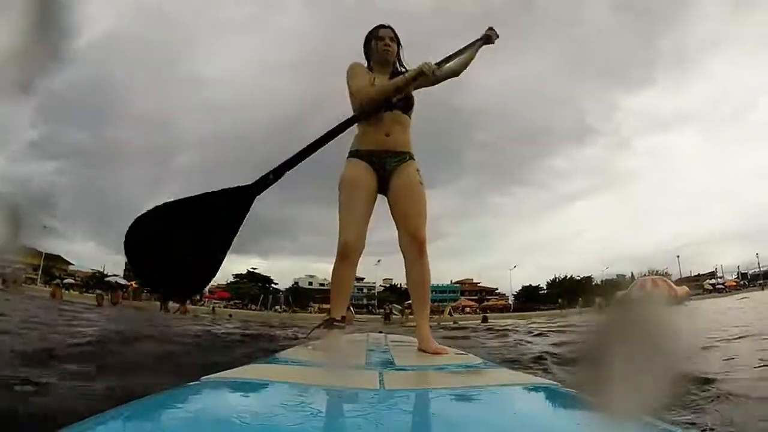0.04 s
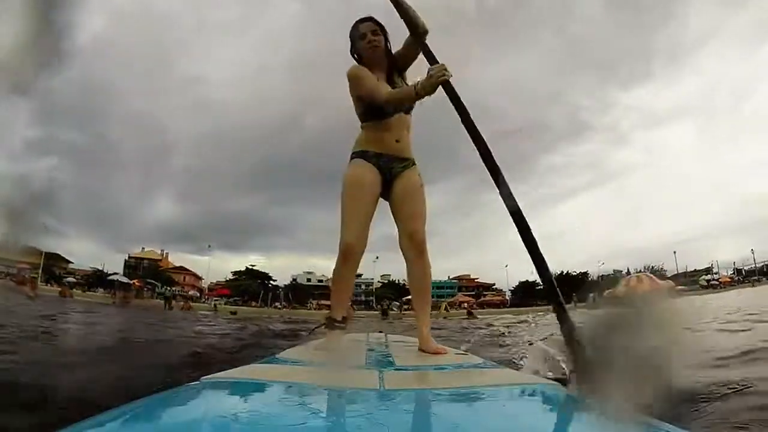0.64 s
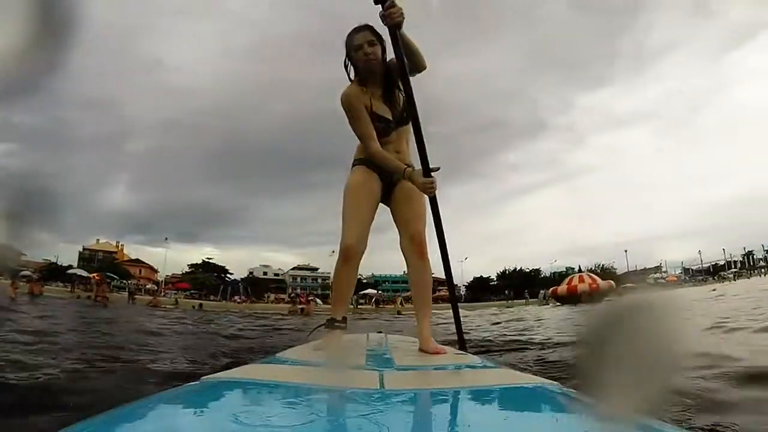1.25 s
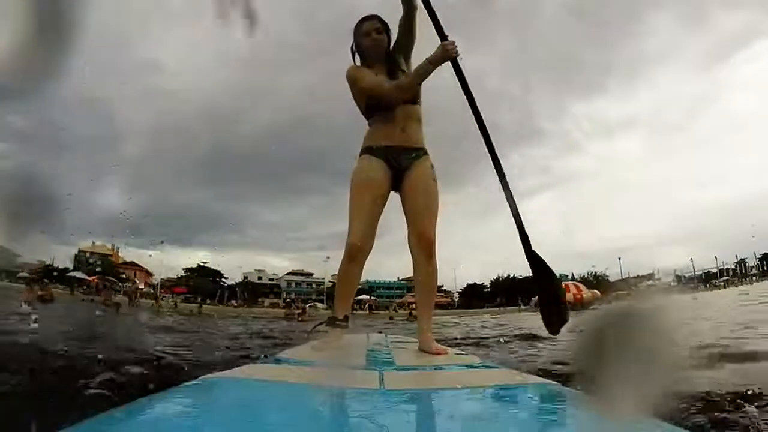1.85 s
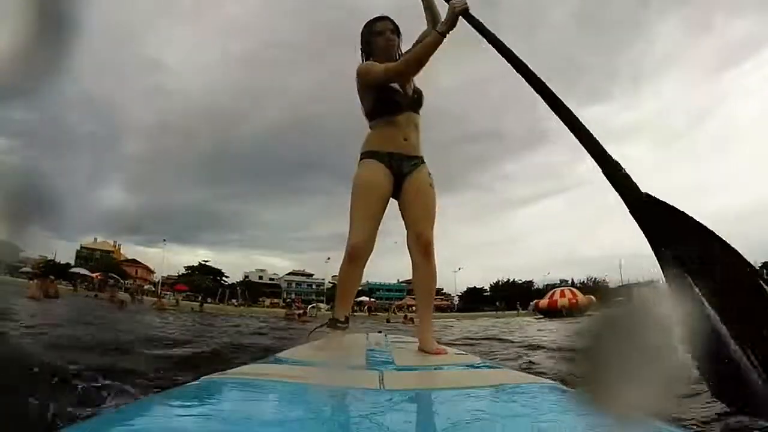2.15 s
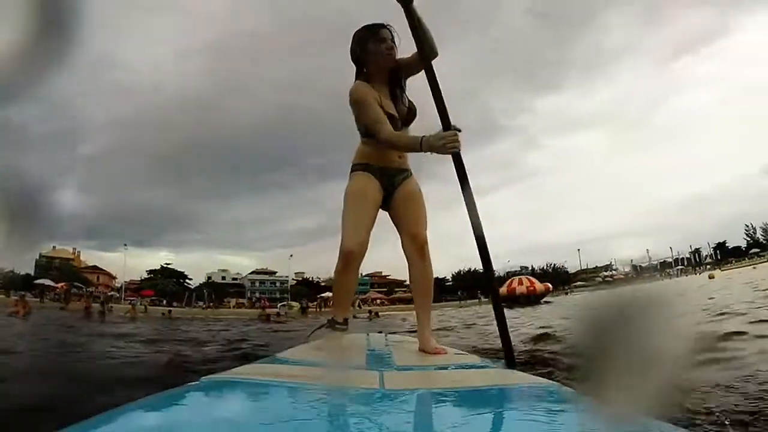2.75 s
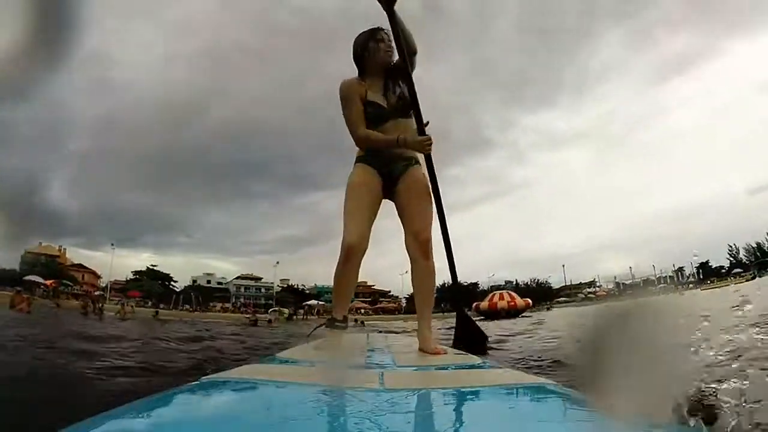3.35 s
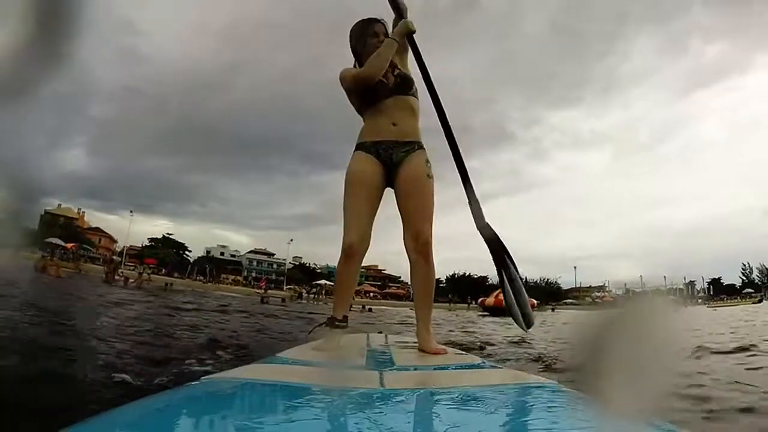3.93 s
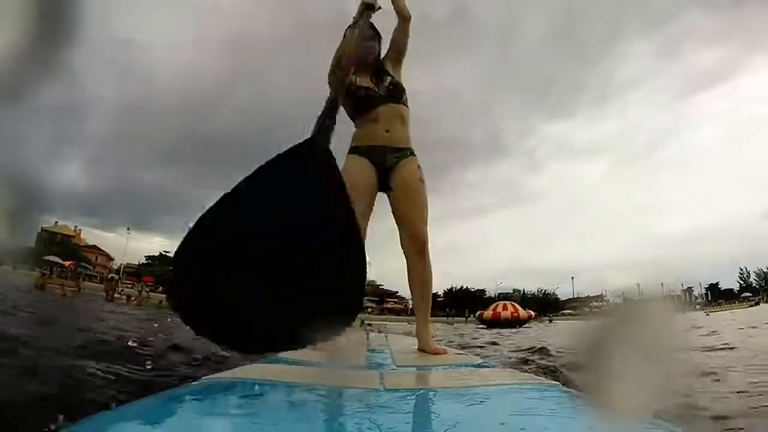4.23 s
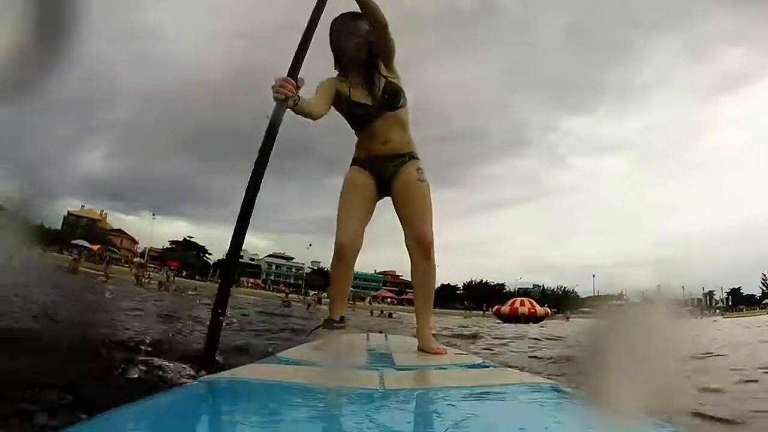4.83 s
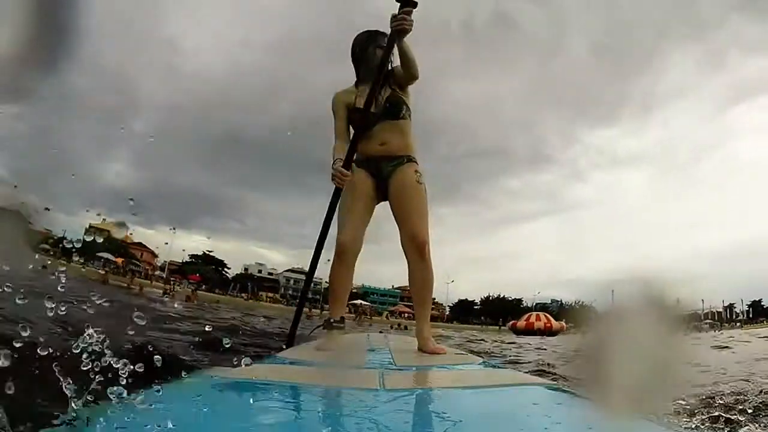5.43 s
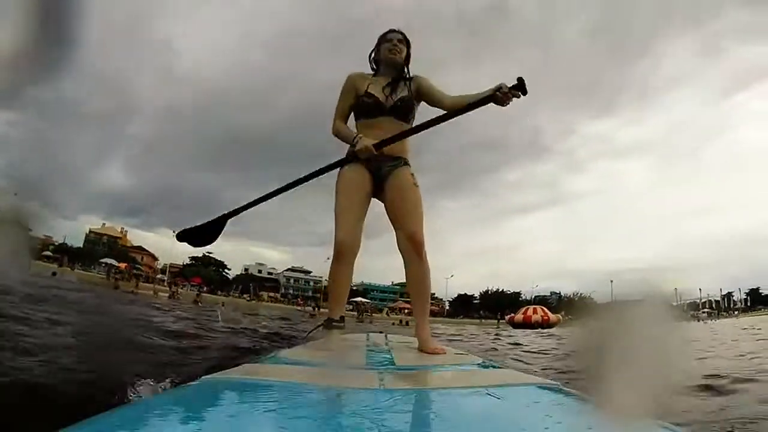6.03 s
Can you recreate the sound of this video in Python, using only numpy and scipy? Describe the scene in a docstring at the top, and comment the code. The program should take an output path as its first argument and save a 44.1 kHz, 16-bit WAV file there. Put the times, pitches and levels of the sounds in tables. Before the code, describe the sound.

Heard from a waterproof case on the nose of a paddleboard at sea, small waves smack and splash against the hull again and again, making it boom over a gusty wind rumble. Bubbles froth after each splash, and close drips and light trickles off the paddle fall in between. The sound is dull and very near, with the hardest thumps distorting, including one at the end.

```python
"""On a paddleboard in choppy sea, the microphone in a waterproof case just above the water at the nose.
From the start wind and chop rumble in the hollow board, and wavelets slap it: a gulp of trapped air,
a spit of spray, a boom, then fizzing bubbles. A wet surface squeaks faintly near 0.4 s. Drops fall close
by throughout; the lifted paddle sheds fine showers around 0.25, 1.9 and 4.1 s. A last heavy boom comes
just after 6 s. The case muffles the treble, and the loudest hits overload."""
import sys
import numpy as np
from scipy import signal
from scipy.fft import rfft, irfft, next_fast_len
from scipy.io import wavfile
from scipy.ndimage import uniform_filter1d

SR = 44100
rng = np.random.default_rng(int(sys.argv[2]) if len(sys.argv) > 2 else 0)


def bounce(signal):
    """Save signal as a 16-bit WAV file at the path given by the first command-line argument."""
    frames = np.transpose(np.atleast_2d(signal))
    limited = np.clip(frames, -1, 1)
    pcm = np.round(limited * 32767).astype(np.int16)
    wavfile.write(sys.argv[1], SR, pcm)


N = 272534
TIME = np.arange(N) / SR

# Blows that set the hollow board booming. Each row: start in seconds, relative level in dB, pitch in Hz.
BOARD_BLOWS = [(0.192, -15.5, 112.5), (0.227, -8.5, 93), (0.255, -6, 98.8), (0.315, -11, 84.5),
               (0.429, -15.5, 91.7), (0.553, -13, 92.5), (0.816, -14.5, 89.7), (0.931, -6.5, 105),
               (1.031, -13, 111.6), (1.463, -5.5, 98.3), (1.5, -7.5, 101.2), (1.996, -9, 105),
               (2.065, -14.5, 93.6), (2.164, -2.5, 95.7), (2.271, -11.5, 101), (2.352, -14, 99),
               (2.645, -19, 100), (2.864, -9.5, 104.7), (2.974, -4.5, 99.7), (3.062, -8, 103.1),
               (3.302, -19, 96), (3.701, -11, 104.5), (3.796, -15, 104.3), (4.024, -21.5, 87.4),
               (4.212, -4, 99.6), (4.31, -1.5, 102.4), (4.379, -8.5, 105.5), (4.4, -6.5, 92.3),
               (4.471, -15.5, 106.7), (4.946, -10.5, 72), (5.015, -11, 83.6), (5.121, -15, 99.8),
               (5.278, -4, 101.4), (5.376, -12.5, 94), (6.077, -13.5, 99), (6.104, -5.5, 95.5),
               (6.153, -1, 116)]


def slaps(spray_db=-2, spray_centre_hz=1642, gulp_db=4.5, gulp_stretch=1.56, glide_per_s=8,
          rise_s=0.00088, run_up_db=-12, run_up_s=0.0051, scatter_db=-23):
    """Water runs up the hull and smacks it: a spit of spray, and a gulp from the air caught under it."""
    # Each row: impact in seconds, relative levels of spray and gulp in dB, the gulp's starting pitch
    # in Hz, the spray's decay time in seconds.
    hits = [(0.135, -18.5, -26, 580, 0.017), (0.182, -13, -11.5, 548, 0.0032),
            (0.194, -14, -24, 580, 0.0027), (0.223, -36, -18.5, 720, 0.0038),
            (0.238, -8.5, -38, 610, 0.0062), (0.249, -8.5, -18.5, 398, 0.0063),
            (0.476, -4.5, -11, 400, 0.0041), (0.497, -12.5, -22.5, 460, 0.0083),
            (0.523, -12.5, -31, 434, 0.00087), (0.539, -13, -40, 340, 0.0038),
            (0.718, -31, -31, 750, 0.009), (0.813, -32, -24, 545, 0.0073), (0.873, -12.5, -13, 530, 0.0035),
            (0.94, -9, -9.5, 630, 0.0021), (1.379, -19, -33.5, 580, 0.0019), (1.415, -14, -29, 725, 0.0028),
            (1.466, -10.5, -16, 588, 0.0057), (1.493, -13, -24, 695, 0.0046),
            (1.502, -7, -24.5, 450, 0.007), (1.89, -25.5, -29, 676, 0.0069),
            (1.993, -15.5, -11.5, 472, 0.0081), (2.029, -12.5, -33, 420, 0.0021),
            (2.066, -17.5, -13, 603, 0.0067), (2.1, -8.5, -26, 850, 0.0056), (2.14, -13, -25, 610, 0.0096),
            (2.152, -7, -16.5, 358, 0.0071), (2.161, -14, -15.5, 315, 0.0037),
            (2.178, -17, -34, 490, 0.0025), (2.221, -18, -43, 740, 0.002), (2.246, -11, -21, 666, .005),
            (2.254, -3.5, -38, 580, 0.0063), (2.266, -12, -7.5, 635, 0.0031),
            (2.29, -11.5, -24.5, 530, 0.0055), (2.351, -17, -22, 682, .0043),
            (2.865, -14, -13.5, 524, 0.00067), (2.894, -14, -20.5, 400, 0.017),
            (2.929, -9.5, -17, 543, 0.0026), (2.941, -11.5, -19, 730, 0.0056),
            (2.959, -9.5, -12.5, 820, 0.0051), (2.979, -10, -14, 462, 0.0041),
            (3.192, -17, -28, 650, 0.035), (3.212, -12, -32, 744, 0.0013), (3.245, -12.5, -32, 400, 0.0016),
            (3.32, -16.5, -28.5, 700, 0.013), (3.66, -7, -46, 605, 0.0023), (3.708, -8.5, -15, 310, 0.0064),
            (3.735, -23, -13.5, 470, 0.01), (3.932, -18.5, -30, 744, 0.011),
            (4.191, -9.5, -15.5, 602, 0.0025), (4.215, -5.5, -19.5, 445, 0.0027),
            (4.236, -11, -35, 480, 0.016), (4.271, -13, -18.5, 820, 0.0074),
            (4.288, -2.5, -28, 475, 0.0089), (4.305, -6.5, -30, 620, 0.0069),
            (4.464, -15, -22.5, 640, 0.0079), (4.873, -29, -38, 404, 0.016),
            (4.934, -27.5, -33.5, 470, 0.0097), (5.227, -9, -35, 800, .021), (5.25, -10.5, -35, 400, 0.017),
            (5.266, -7, -22, 500, 0.0073), (5.287, -27, -24, 447, 0.0041), (5.426, -20, -53, 525, 0.045),
            (5.457, -14.5, -38, 835, 0.0051), (5.476, -16, -33, 536, 0.0053),
            (5.81, -14.5, -24.5, 635, 0.0092), (6.063, -13, -24, 440, 0.045),
            (6.101, -7.5, -19.5, 650, 0.013), (6.13, -11, -28, 640, 0.018), (6.151, -8, -13, 528, 0.0058),
            (6.166, -37, -10.5, 520, 0.0022)]
    out, lead = np.zeros(N), 1024  # samples of run-up before the impact
    t = (np.arange(9216) - lead) / SR
    age = np.maximum(t, 0)
    for s, high_db, low_db, gulp_hz, decay_s in hits:
        spray_noise, gulp_noise = rng.standard_normal((2, len(t)))
        spray_hz = spray_centre_hz * np.exp(0.15 * rng.uniform(-1, 1))
        onset = 1 - np.exp(-(age / (rise_s + 0.072 * decay_s)) ** 2)  # long slaps start more softly
        # With little trapped air the blow comes without warning.
        cushion = amp(run_up_db + min(low_db - high_db, 0) / 2)
        run_up = cushion * np.exp(-abs(t) / run_up_s) * (1 - onset)
        scatter = amp(scatter_db) * np.exp(-age / (5 * decay_s))  # droplets fall back after the blow
        spray = unit(resonate(spray_noise, spray_hz, width_hz=1500))
        spray *= run_up + onset * (np.exp(-age / decay_s) + scatter)
        add(spray, lead / SR, 0.56 * bubble(spray_hz, cycles=7, rise=0.0074))
        pocket_hz = gulp_hz * (1 + glide_per_s * np.minimum(age, 0.03))  # climbs as the pocket shrinks
        gulp = unit(resonate(gulp_noise, pocket_hz, width_hz=330))
        gulp *= run_up + onset * (np.exp(-age / (decay_s * gulp_stretch)) + scatter)
        add(gulp, lead / SR, 0.96 * bubble(gulp_hz, cycles=3, rise=0.074))
        gulp = signal.lfilter(*signal.butter(2, 1300, fs=SR), gulp)
        for sound, db in ((spray, high_db + spray_db), (gulp, low_db + gulp_db)):
            heard = through_case(sound)
            add(out, s - lead / SR, amp(db) * heard / local_rms(heard, size=130).max())
    return out


def booms(level_db=1.5, swell_s=0.013, ring_db=-17, ring_s=0.11):
    """Each blow swells over a cycle of the board's low resonance and leaves a softer ring."""
    out, t = np.zeros(N), np.arange(SR) / SR
    for s, db, hz in BOARD_BLOWS:
        push = (t / swell_s) ** 2 * np.exp(2 - 2 * t / swell_s)
        ring = amp(ring_db) * (1 - np.exp(-t / swell_s)) * np.exp(-t / ring_s)
        add(out, s, amp(db + level_db) * (push + ring) * np.sin(2 * np.pi * hz * t))
    return out


def wash(froth_gain, churn_gain):
    """A froth of small bubbles and the churning of large ones swell with each wavelet."""
    froth = bubble_cloud(950, 3090, pitches=36, per_s=1500, cycles=4.44, spread_db=3.5,
                         fizz_db=-1.5, fizz_hz=4330, fizz_width_hz=7200)
    churn = bubble_cloud(300.3, 957, pitches=16, per_s=450, cycles=1.56, spread_db=1.0,
                         fizz_db=-5.5, fizz_hz=570, fizz_width_hz=250)
    return froth * froth_gain + churn * churn_gain


def wavelet_gains(froth_lap_db=-1, churn_lap_db=-8):
    """Gains of froth and churning: every wavelet surges over the quiet lapping along the hull."""
    # Each row: crest in seconds, relative levels of froth and churning in dB, rise and fall in seconds.
    wavelets = [(0.24, -23.5, -19, 0.043, 0.046), (0.508, -31.5, -35, 0.016, 0.075),
                (0.651, -37.5, -39, 0.018, .05), (0.933, -25, -29.5, 0.035, 0.051),
                (1.499, -14, -22, 0.059, 0.014), (2.25, -14.5, -31.5, 0.11, 0.048),
                (2.78, -26.5, -30, 0.047, .014), (2.969, -15, -23.5, 0.05, 0.048),
                (3.092, -27.5, -26.5, 0.048, 0.024), (3.289, -20.5, -31.5, 0.061, 0.064),
                (3.713, -18, -25, 0.036, 0.075), (4.227, -14.5, -22.5, 0.025, 0.083),
                (4.45, -26, -29, .025, 0.058), (5.251, -12, -20.5, .018, 0.058),
                (5.339, -30, -21.5, 0.033, 0.021), (5.481, -32, -30.5, 0.013, 0.037),
                (5.83, -24, -46, 0.012, 0.029), (6.14, -13, -24, 0.039, 0.027)]
    # Each row: time in seconds, relative level of the lapping in dB.
    lapping_curve = [(0, -42), (.42, -47.5), (.62, -36.5), (1.17, -57), (1.32, -31), (1.6, -55.5),
                     (1.8, -54), (1.95, -43), (2.5, -45.5), (2.8, -37), (3.5, -41), (4.1, -40.5),
                     (4.7, -47.5), (4.86, -53), (5.12, -32.5), (5.7, -36.5), (6.18, -32.5)]
    lapping = follow(lapping_curve)
    froth_power = (amp(froth_lap_db) * lapping) ** 2
    churn_power = (amp(churn_lap_db) * lapping) ** 2
    for s, froth_db, churn_db, rise_s, fall_s in wavelets:
        swell = surge(s, rise_s, fall_s)
        froth_power += (amp(froth_db) * swell) ** 2
        churn_power += (amp(churn_db) * swell) ** 2
    return (np.sqrt(froth_power) * clumps(depth_db=3.7, per_s=60),
            np.sqrt(churn_power) * clumps(depth_db=2.5, per_s=15))


def clumps(depth_db, per_s):
    """Random swells of gain: bubbles break in bunches."""
    knots = rng.standard_normal(2048)
    return amp(depth_db * np.interp(TIME * per_s, np.arange(len(knots)), knots))


def bubble_cloud(low_hz, high_hz, pitches, per_s, cycles, spread_db, fizz_db, fizz_hz, fizz_width_hz):
    """Many bubbles of random strength over a bed of fine fizz, at an even overall level."""
    out = np.zeros(N)
    for hz in np.geomspace(low_hz, high_hz, pitches):
        chance, size, sign = rng.random((3, N))
        ring = bubble(hz, cycles, rise=0.012) * hz ** 0.92
        for i in np.flatnonzero(chance < per_s / pitches / SR):
            strength = amp(spread_db * min(-np.log(size[i]), 4))
            add(out, i / SR, strength * np.sign(sign[i] - 0.5) * ring)
    fizz = resonate(rng.standard_normal(N), fizz_hz, fizz_width_hz)
    heard = through_case(unit(out) + amp(fizz_db) * unit(fizz))
    return heard / local_rms(heard, size=1000)


def bubble(hz, cycles, rise):
    """A pocket of air rings for some cycles and rises in pitch as it nears the surface."""
    age = np.arange(int(6 * cycles / hz * SR)) * hz / SR / cycles  # in decay times
    envelope = (1 - np.exp(-age * cycles * 2)) * np.exp(-age)
    return envelope * np.sin(2 * np.pi * cycles * (age + rise * age ** 2 / 2))


def drop(hz, rise, splat, splat_s):
    """A drop lands with a tiny splat and leaves one ringing bubble."""
    t = np.arange(2048) / SR
    sound = splat * rng.standard_normal(len(t)) * np.exp(-t / splat_s)
    add(sound, 0, bubble(hz, cycles=6, rise=rise))
    return sound


def drips():
    """Single drops plink on the water closest to the microphone."""
    # Each row: start in seconds, level in dB, pitch in Hz, strength of the splat against the bubble.
    near_drops = [(0.12, -33, 2660, 0.45), (0.301, -26.5, 2730, 0.42), (0.327, -28.5, 626, 0.2),
                  (0.437, -31.5, 1990, 0.12), (0.455, -30, 3500, 1.1), (0.582, -27.5, 1980, .7),
                  (0.651, -27.5, 2330, 1.1), (0.885, -20, 365, .05), (0.969, -20, 1370, 0.27),
                  (1.221, -35.5, 2070, .33), (1.271, -26, 1050, 0.21), (1.671, -39, 4200, .8),
                  (1.838, -27.5, 1330, 2.6), (2.195, -18, 1610, .6), (2.334, -20.5, 2530, 0.47),
                  (2.43, -35.5, 3550, 0.35), (2.476, -29.5, 1330, .1), (2.539, -31.5, 1030, .65),
                  (2.595, -31.5, 1690, .3), (2.719, -22, 1165, .34), (2.733, -23.5, 755, 0.24),
                  (2.755, -15, 1490, 0.35), (2.781, -15.5, 1324, 0.25), (2.793, -17.5, 1620, 0.32),
                  (3.301, -16.5, 2130, 1.2), (3.434, -28, 1680, .5), (3.509, -29, 2110, 1.1),
                  (3.588, -25, 1440, 2), (3.613, -23, 1550, 0.25), (3.669, -11, 2580, 0.51),
                  (3.806, -23, 1490, 0.44), (3.968, -26, 1220, .2), (4.381, -5.5, 2630, 0.74),
                  (4.419, -24, 1360, 0.82), (4.574, -32.5, 2400, 0.66), (4.751, -32, 843, 1.1),
                  (4.793, -32.5, 1090, 1.4), (5.425, -18, 1970, 1.6), (5.457, -15, 1177, 0.17),
                  (5.472, -21, 331, .05), (5.476, -19, 980, 0.6), (5.581, -26.5, 1060, .1),
                  (5.647, -27.5, 1420, .1), (5.709, -15.5, 2390, 0.47), (6.011, -20, 2170, 0.93)]
    out = np.zeros(N)
    for s, db, hz, splat in near_drops:
        heard = through_case(drop(hz, rise=0.016, splat=splat, splat_s=0.003))
        add(out, s, amp(db) * heard / local_rms(heard, size=90).max())
    return out


def buffeting(wind_db=-1, shudder_db=-13, rise_s=0.026, fall_s=0.15):
    """Wind shakes the board and the case without pause, and each blow leaves them shuddering."""
    # Each row: frequency in Hz, relative spectral density of the shaking in dB.
    rumble_spectrum = [(12, -13), (26, -13.5), (36, -11), (60, -8), (80, -0.5), (102, 5.5), (122, -5),
                       (150, -21.5), (190, -40.5), (300, -52.5), (900, -80.5), (4000, -130)]
    # Each row: time in seconds, relative strength of the wind in dB.
    gusts = [(0.0, -29), (0.22, -38), (0.38, -19.5), (1.27, -32.5), (2.01, -32.5), (2.24, -14.5),
             (2.46, -23), (3.15, -20), (3.46, -31.5), (3.68, -39), (3.85, -23), (4.23, -39), (4.39, -28),
             (4.63, -39), (4.92, -30), (5.18, -16.5), (5.68, -37.5), (6.18, -19)]
    shake = colour(rng.standard_normal(N), rumble_spectrum)
    shudder_power = sum((amp(db + shudder_db) * surge(s, rise_s, fall_s)) ** 2
                        for s, db, _ in BOARD_BLOWS)
    wind = amp(wind_db) * follow(gusts)
    return shake / local_rms(shake, size=900) * np.sqrt(wind ** 2 + shudder_power)


def patter(froth_gain, level_db=-37, per_s=60, spread_db=5.0, low_hz=1000, high_hz=5800):
    """Fine droplets fall back on the water, each with its own pitch; they grow with the froth."""
    out = np.zeros(N)
    for when, size, pitch in rng.random((round(per_s * N / SR), 3)):
        hz = low_hz * (high_hz / low_hz) ** pitch
        droplet = unit(drop(hz, rise=0.028, splat=0.079, splat_s=0.00097))
        strength = amp(spread_db * min(-np.log(size), 3))
        add(out, when * N / SR, strength * droplet)
    return amp(level_db) * unit(through_case(out) * froth_gain ** 0.6)


def squeak():
    """A wet surface squeaks faintly: a thin rising tone with weak overtones."""
    # Each row: time in seconds, pitch in Hz, level in dB.
    glide = [(.33, 1000, -46), (.39, 1040, -43), (.46, 1100, -43)]
    s, hz, db = np.transpose(glide)
    t = np.arange(s[0], s[-1], 1 / SR)
    turns = np.cumsum(np.interp(t, s, hz)) / SR
    tone = sum(np.sin(2 * np.pi * k * turns) / k ** 3 for k in range(1, 7))
    out = np.zeros(N)
    add(out, s[0], unit(tone) * amp(np.interp(t, s, db)) * signal.windows.tukey(len(t), 0.2))
    return out


def paddle_showers(per_s=900, spread_db=6.5, fizz_hz=6500, fizz_width_hz=5000):
    """Tiny drops off the lifted blade tick on the water and blend into a light fizz."""
    # Each row: peak in seconds, level in dB, rise and fall in seconds.
    showers = [(0.25, -55, 0.097, .2), (1.9, -54.5, 0.45, 0.24), (4.099, -55.5, 0.47, 0.15)]
    chance, size = rng.random((2, N))
    impacts = (chance < per_s / SR) * amp(spread_db * np.minimum(-np.log(size), 3))
    ticks = np.diff(resonate(impacts, fizz_hz, fizz_width_hz), prepend=0)
    swells = sum(amp(db) * surge(s, rise_s, fall_s) for s, db, rise_s, fall_s in showers)
    return unit(through_case(ticks)) * swells


def sea(level_db=-50):
    """The smooth hiss of waves farther off."""
    # Each row: frequency in Hz, relative spectral density in dB.
    open_water = [(60, 12), (220, -6), (400, 2), (900, -0.5), (1400, 6.5), (2600, -27), (3300, -11.5),
                  (6000, -27), (9000, -27.5), (15000, -45)]
    return amp(level_db) * unit(colour(rng.standard_normal(N), open_water))


def through_case(x):
    """The case around the microphone rings with its mount at a few pitches and shuts out the treble."""
    # Each row: resonance in Hz, width in Hz, gain in dB.
    modes = [(360.4, 16, -0.5), (684, 60, -7), (1445, 27, -6), (1636, 23, -36), (2020, 256, 7.5),
             (2410, 140, -20), (3860, 37, -4.5), (4470, 140, -5), (5690, 380, 1)]
    # Each row: frequency in Hz, gain through the case in dB.
    response = [(190, -14), (330, -4.5), (470, -9.5), (660, -9), (950, -11), (1400, -5), (2000, -15.5),
                (2700, -11), (3100, -22.5), (3700, -20), (5000, -28.5), (6200, -34.5), (7500, -45),
                (15500, -73)]
    ringing = sum(amp(db) * resonate(x, hz, width_hz) for hz, width_hz, db in modes)
    return colour(x + ringing, response)


def colour(x, points):
    """Minimum-phase filter through points of frequency in Hz and gain in dB."""
    size = next_fast_len(len(x) + 4096)
    hz, db = np.transpose(points)
    log_hz = np.log(abs(np.fft.fftfreq(size, 1 / SR)) + 1)
    log_gain = np.log(amp(np.interp(log_hz, np.log(hz), db)))
    response = np.exp(np.conj(signal.hilbert(log_gain)))
    return irfft(rfft(x, size) * response[:size // 2 + 1], size)[:len(x)]


def resonate(x, hz, width_hz):
    """A resonance of gain about 1 whose centre may move."""
    turn = np.exp(2j * np.pi * np.cumsum(hz * np.ones(len(x))) / SR)
    pole = np.exp(-np.pi * width_hz / SR)
    return 2 * (turn * signal.lfilter([1 - pole], [1, -pole], x / turn)).real


def surge(s, rise_s, fall_s):
    """Gain that builds up to 1 at s seconds and dies away after it."""
    return np.exp(-np.maximum((s - TIME) / rise_s, (TIME - s) / fall_s))


def follow(curve):
    """Gain in time through points of seconds and dB."""
    s, db = np.transpose(curve)
    return amp(np.interp(TIME, s, db))


def amp(db):
    """Decibels to gain."""
    return 10 ** (np.asarray(db) / 20)


def unit(x):
    """Scales to rms 1."""
    return x / np.sqrt(np.mean(x ** 2) + 1e-20)


def local_rms(x, size):
    """Running rms, smoothed twice over size samples."""
    power = uniform_filter1d(x ** 2, size, mode="constant")
    return np.sqrt(abs(uniform_filter1d(power, size, mode="constant")) + 1e-14)


def add(mix, s, sound):
    """Mixes a sound in at s seconds."""
    part = mix[max(round(s * SR), 0):][:len(sound)]
    part += sound[:len(part)]


def scene():
    """Water, board and wind at the one microphone."""
    froth_gain, churn_gain = wavelet_gains()
    water = wash(froth_gain, churn_gain) + slaps() + drips() + patter(froth_gain) + paddle_showers()
    return (water + sea() + booms() + buffeting() + squeak())[None]


def record(dry):
    """The loudest hits overload and flatten at full scale; the treble ends at 16 kHz."""
    overloaded = np.clip(dry, -1, 1)
    lowpass = signal.firwin(255, 16000, window=("kaiser", 8), fs=SR)
    return signal.oaconvolve(overloaded, lowpass[None], "same")


dry = scene()
out = record(dry)
bounce(out)
```